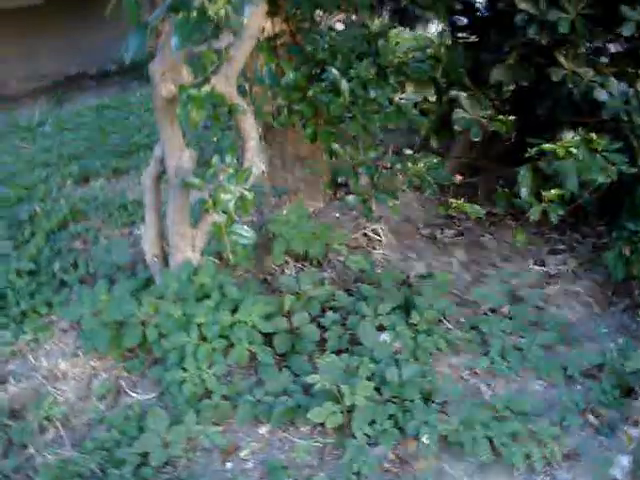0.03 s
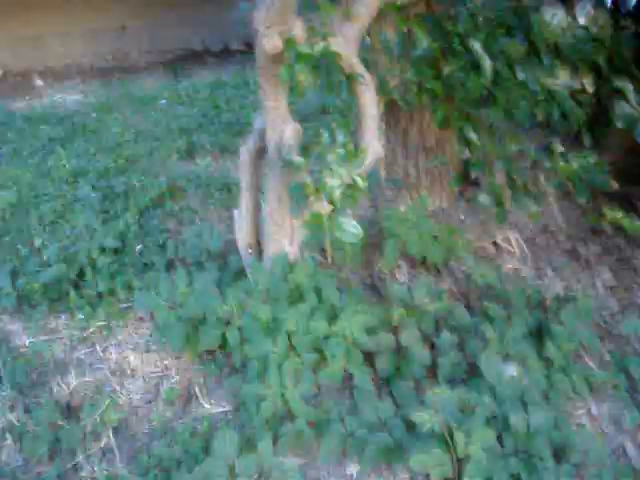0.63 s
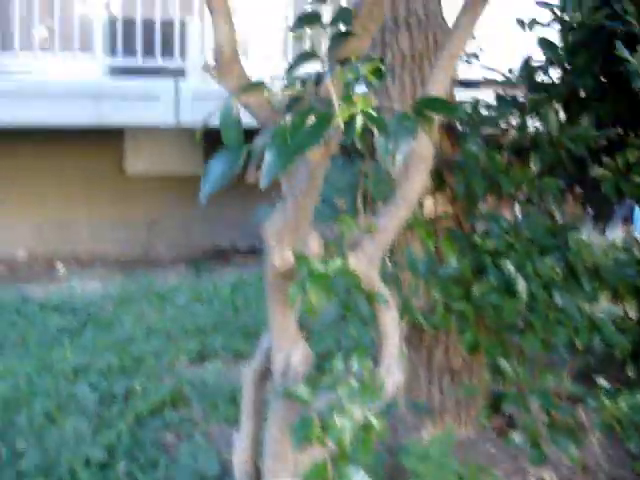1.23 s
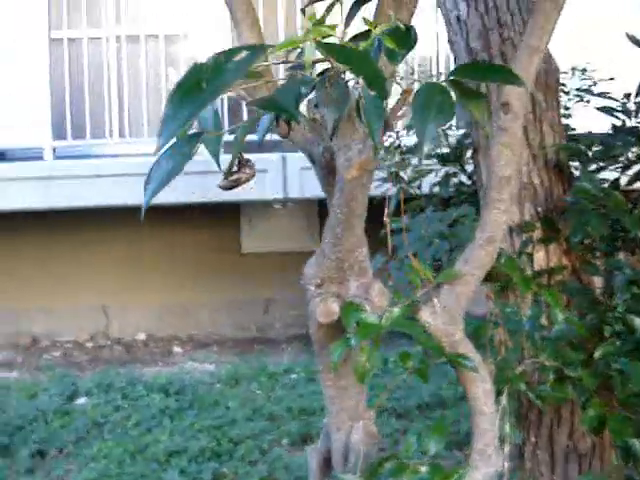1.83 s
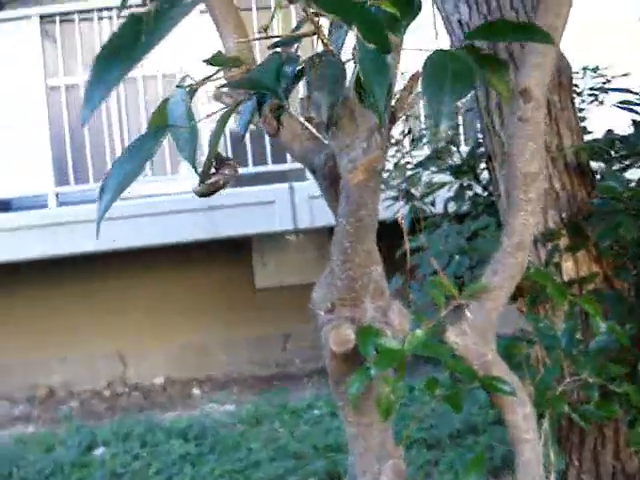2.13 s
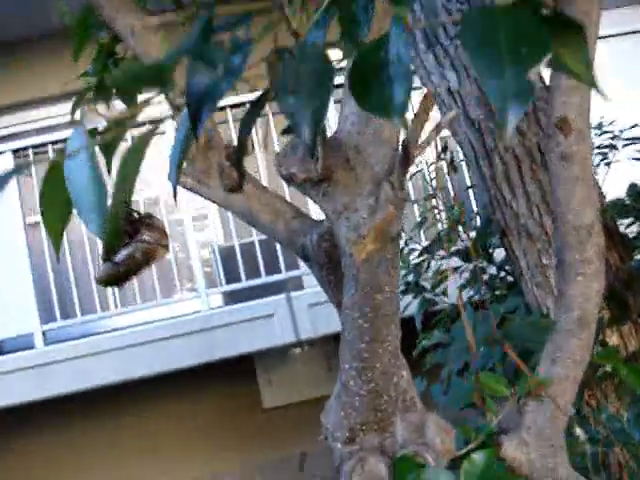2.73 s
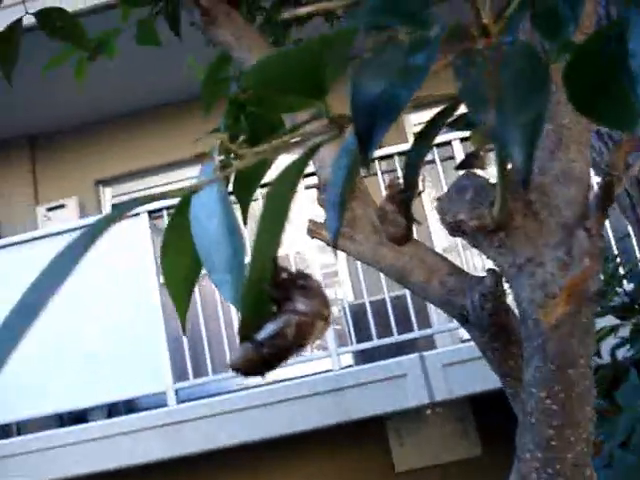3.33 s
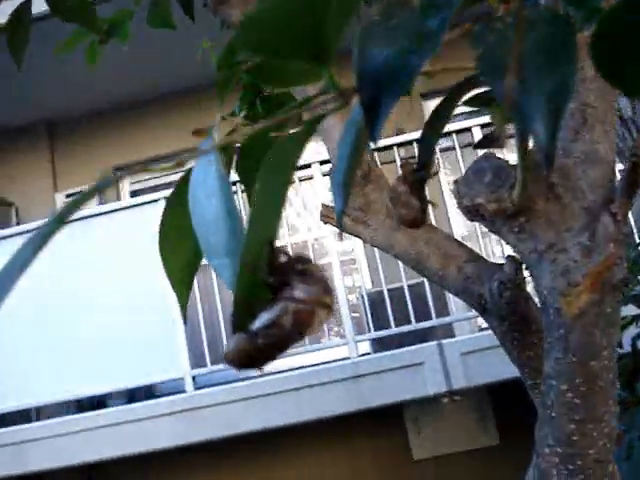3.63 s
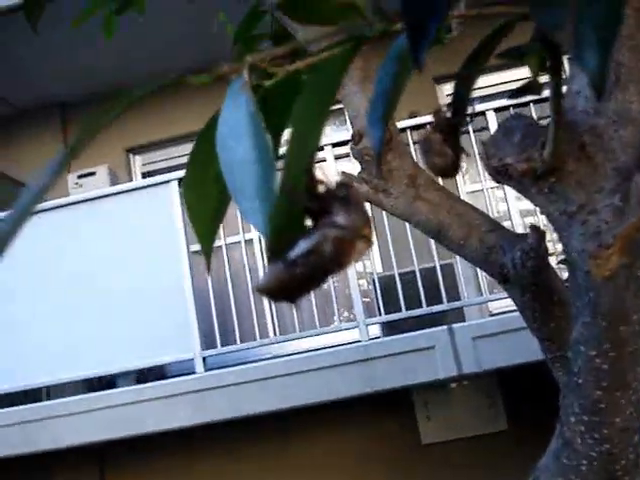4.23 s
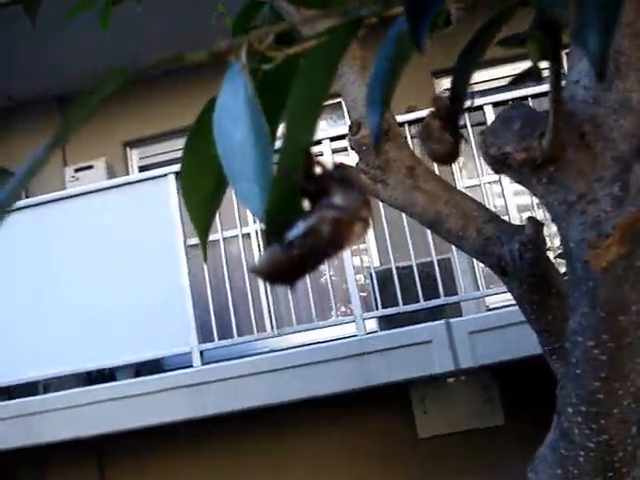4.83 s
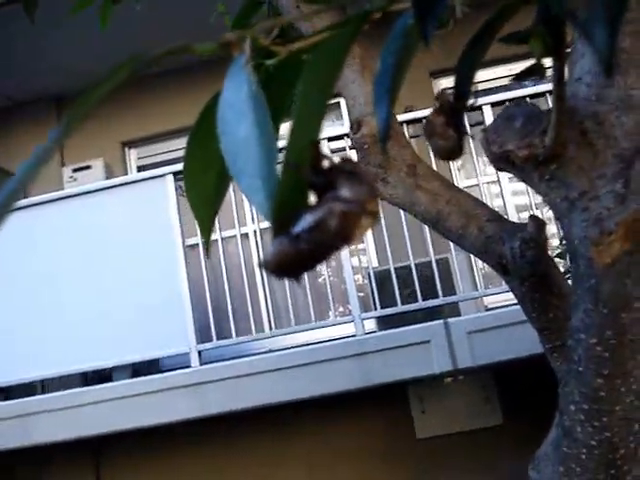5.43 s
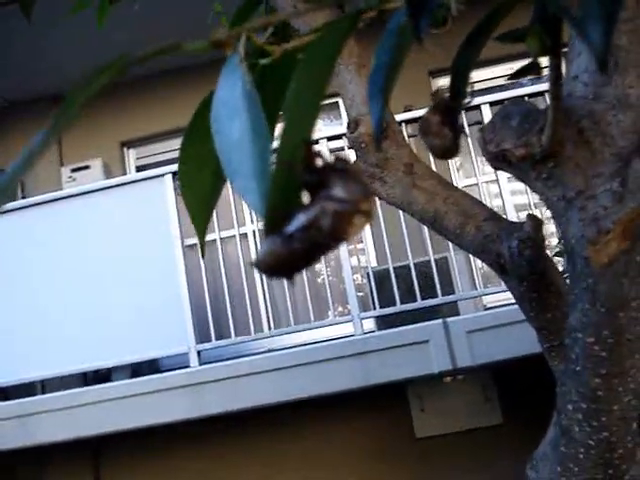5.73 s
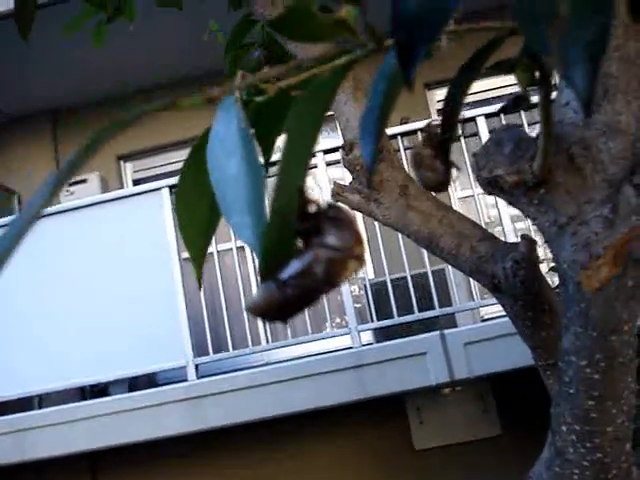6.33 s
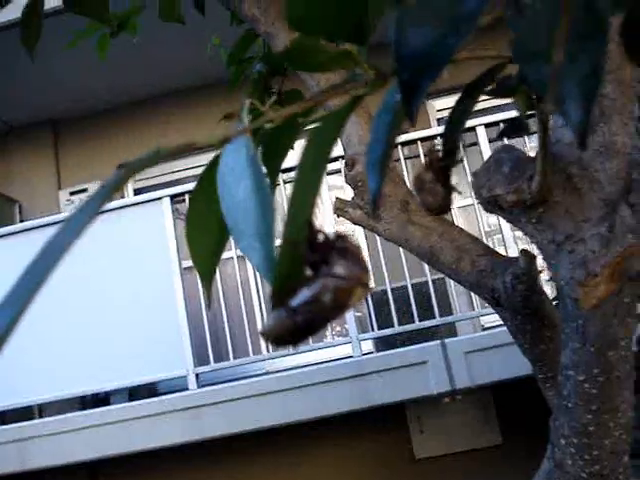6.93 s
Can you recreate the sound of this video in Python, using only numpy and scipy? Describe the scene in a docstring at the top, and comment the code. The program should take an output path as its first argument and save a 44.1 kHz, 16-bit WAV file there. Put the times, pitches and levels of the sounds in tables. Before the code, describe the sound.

A dense chorus of cicadas hisses in garden trees while one nearby cicada grows louder, pulsing in quick, buzzing, raspy syllables.

```python
"""Cicadas sing in garden trees beside an apartment block, heard through a small mono camera.
At first a crowd of buckling tymbals blends into a hiss, while a far caller throbs five times a second
and adds shrill surges. After a second a close caller enters faintly; it grows as the far one
dies away. Each syllable is a buzzing low note, then a bright rasp as its abdomen tightens.
From about five seconds on it quickens, while the crowd's hiss grows quieter."""
import sys
import numpy as np
from scipy import signal
from scipy.fft import rfft, irfft
from scipy.io import wavfile
from scipy.ndimage import map_coordinates

SR = 44100
rng = np.random.default_rng(int(sys.argv[2]) if len(sys.argv) > 2 else 0)


def inscribe(sig):
    """Save sig as 16-bit PCM at rate SR to the path in sys.argv[1].

    A 1-D sig is mono; a 2-D sig holds one channel per row.
    Samples are clipped to [-1, 1] before scaling.
    """
    pcm = np.round(np.clip(np.atleast_2d(sig).T, -1, 1) * 32767)
    wavfile.write(sys.argv[1], SR, pcm.astype(np.int16))


N = 308259
TIME = np.arange(N) / SR
TYMBAL_HZ = 366.8  # buckling rate under a slack abdomen
RASP_ENVELOPE_S = (0.032, 0.05, 0.033)  # attack, hold, release


def undb(db):
    """Decibels to amplitude ratio."""
    return 10 ** (np.asarray(db) / 20)


def unit(x):
    """Normalisation to rms 1."""
    return x / np.sqrt(np.mean(x ** 2))


def walk(rate_hz):
    """Spline interpolation of random values: a smooth drift with a spread near 1."""
    knots = rng.standard_normal(2048)
    return map_coordinates(knots, [TIME * rate_hz], order=3, mode="wrap")


def follow(curve):
    """Linear interpolation of each level column over time."""
    time_s, *columns = np.transpose(curve)
    return [np.interp(TIME, time_s, column) for column in columns]


def ring(x, outline, stretch=1, size=2048):
    """Minimum-phase filtering by a spectral outline; stretch multiplies all its frequencies."""
    hz, db = np.transpose(outline)
    grid_hz = np.maximum(np.fft.rfftfreq(size, 1 / SR), 1)
    gain_db = np.interp(np.log(grid_hz), np.log(np.sort(hz) * stretch), db)
    cepstrum = irfft(np.log(undb(gain_db)))
    cepstrum[1:size // 2] *= 2  # folding the cepstrum makes the response causal
    cepstrum[size // 2 + 1:] = 0
    impulse_response = irfft(np.exp(rfft(cepstrum)))
    return signal.oaconvolve(x, impulse_response)[:N]


def beats(first_s, period_s, hurry_from_s=0, hurry_s_per_s=0):
    """Periodic syllable times; once the caller hurries, the period shrinks linearly."""
    times = [first_s]
    while times[-1] < TIME[-1]:
        times.append(times[-1] + period_s - hurry_s_per_s * max(times[-1] - hurry_from_s, 0))
    return np.array(times)


def phrase(times, attack_s, hold_s, release_s):
    """Amplitude envelope of a row of calls: each swells to its time, holds and dies away."""
    rise = lambda since: np.clip(1 + since / attack_s, 0, 1)
    fall = lambda since: np.clip(1 - (since - hold_s) / release_s, 0, 1) ** 2
    return sum(rise(TIME - s) * fall(TIME - s) for s in times)


def tymbal(hz, jitter, scatter_db, rustle, decay_cycles):
    """Impulse excitation: the tymbal clicks as it buckles, and its ribs follow with a decaying rustle."""
    turns = np.cumsum(hz * (1 + jitter * walk(200))) / SR
    cycle = turns.astype(int)
    force = undb(scatter_db * rng.standard_normal(8192))[cycle % 8192]
    clicks = np.diff(cycle, prepend=0) * force
    ribs = np.exp(-(turns % 1) / decay_cycles) * force * rng.standard_normal(N)
    return unit(unit(clicks - clicks.mean()) + rustle * unit(ribs))


def foliage(x, wet_db, smear_s=0.013):
    """Scattering: leaves and trunks turn clicks into a diffuse hiss that follows their power."""
    decay = np.exp(-1 / (smear_s * SR))
    power = signal.lfilter([1 - decay], [1, -decay], x ** 2)
    diffuse = np.sqrt(power) * rng.standard_normal(N)
    return (x + undb(wet_db) * diffuse) / np.sqrt(1 + undb(wet_db) ** 2)


# spectrum of the neighbourhood's low wash: frequency_hz, gain_db
WASH_SPECTRUM = [(20, 8), (60, 4), (120, 3.5), (400, 3.5), (1000, 2), (1800, 2), (3000, -13.5)]


def neighbourhood(level_db):
    """Ambient noise: a low, broadband wash whose level wavers slightly."""
    return unit(ring(rng.standard_normal(N), WASH_SPECTRUM)) * undb(level_db + 0.55 * walk(21.07))


def chorus(resonances, waver_db, flutter_db, size_spread, wet_db, count=6):
    """Incoherent summation of cicadas, each with its own size, tymbal rate and wavering effort."""
    voices = 0
    for rank in np.linspace(-1, 1, count):
        hz = rng.uniform(150, 520) * (1 + .05 * walk(3))
        buzz = tymbal(hz, jitter=.15, scatter_db=1, rustle=3.2, decay_cycles=0.35)
        effort = undb(waver_db * walk(10) + flutter_db * walk(60))
        voices = voices + effort * ring(foliage(buzz, wet_db), resonances, 1 + size_spread * rank)
    return unit(voices)


# the crowd's hiss holds steady, then grows quieter: time_s, middle_db, treble_db
CROWD_LEVELS = [(0, -22.5, -22.0), (3.5, -23, -23), (5.3, -26.5, -25.5), (6.0, -29.5, -28), (7, -32.5, -29)]
# body resonances of the crowd, middle and treble bands: frequency_hz, gain_db
CROWD_MIDDLE = [(1500, -36), (1900, -18.5), (2300, -4), (2600, -4.5), (3100, -0.5), (3700, -3), (4500, 0),
                (5500, -2), (6300, -8), (7300, -25.5)]
CROWD_TREBLE = [(5400, -27.5), (6400, -4.5), (7300, 1), (8700, 1.5), (10000, -1), (12000, -2.5),
                (13900, -7.5), (15100, -1)]


def crowd():
    """Superposition: two distant choruses, one in each band, merge into a hiss."""
    middle_db, treble_db = follow(CROWD_LEVELS)
    middle = chorus(CROWD_MIDDLE, waver_db=0.5, flutter_db=0.4, size_spread=0.026, wet_db=-4.0)
    treble = chorus(CROWD_TREBLE, waver_db=0.63, flutter_db=2.0, size_spread=0.013, wet_db=-2.5)
    return middle * undb(middle_db) + treble * undb(treble_db)


def far_buzz(hz, wet_db):
    """Scattering by leaves blurs the pulse train of the far caller's tymbal."""
    buzz = tymbal(hz * (1 + .03 * walk(11)), jitter=.08, scatter_db=0.5, rustle=1.7, decay_cycles=0.25)
    return foliage(buzz, wet_db)


# resonances of a taut abdomen: frequency_hz, gain_db
TAUT_ABDOMEN = [(1700, -24), (3000, -17), (4500, -3), (5500, -2), (6450, -4.5), (7450, 4.5), (7900, -0.5),
                (8400, 2), (9100, 1), (10000, 0), (12500, -4.5), (13900, -10), (15300, -7.5)]


def rasp(wet_db):
    """Forced vibration: fast, ragged clicks ring the taut abdomen near 8 kHz."""
    buzz = tymbal(2 * TYMBAL_HZ, jitter=0.18, scatter_db=3.0, rustle=1.9, decay_cycles=0.8)
    return unit(ring(foliage(buzz, wet_db), TAUT_ABDOMEN))


# the far song holds, then dies away: time_s, level_db
FAR_LEVELS = [(0, -29), (.5, -28), (1.3, -27), (2.45, -27.5), (2.8, -31), (3.5, -50)]
# body resonances of its throb: frequency_hz, gain_db
THROB_RESONANCES = [(1600, -43.5), (2000, -14.5), (2280, 1), (2600, -4), (3080, 1), (3500, -2.5),
                    (4200, -16), (9000, -49)]


def far_caller():
    """Amplitude modulation at an even beat: low throbs alternate with faint rasps."""
    times = beats(first_s=.07, period_s=.2)
    rasp_lag_s, rasp_db = 0.12, -7.5  # relative to the throb
    level_db, = follow(FAR_LEVELS)
    throb_gain = phrase(times, attack_s=0.07, hold_s=0.014, release_s=0.15)
    throbs = unit(ring(far_buzz(hz=341.7, wet_db=4.0), THROB_RESONANCES)) * throb_gain
    rasps = rasp(wet_db=21) * phrase(times + rasp_lag_s, *RASP_ENVELOPE_S) * undb(rasp_db)
    return (throbs + rasps) * undb(level_db)


# the far caller's shrill surges, just after some of its throbs: peak_s, level_db, resonance_hz
SURGES = [(0.14, -26, 5000), (0.34, -24, 4620), (0.54, -27, 4650), (0.61, -27, 4750), (1.58, -27, 4650),
          (1.66, -32, 4700), (1.735, -24, 4650), (2.15, -27, 5230), (2.48, -24, 3570)]
# body resonances of a shrill call: frequency_hz, gain_db
SHRILL_RESONANCES = [(3000, -25.5), (4100, -10.5), (4650, -1), (4950, -1.5), (5400, -9), (6200, -17.5),
                     (9000, -20)]
SHRILL_CENTRE_HZ = 4780


def far_surges():
    """Resonance scaling: the far caller's buzz swells, ringing at each surge's own frequency."""
    buzz = far_buzz(hz=431, wet_db=2)
    surges = 0
    for peak_s, level_db, resonance_hz in SURGES:
        tone = unit(ring(buzz, SHRILL_RESONANCES, resonance_hz / SHRILL_CENTRE_HZ))
        surges += tone * phrase([peak_s], attack_s=0.03, hold_s=0.012, release_s=0.1) * undb(level_db)
    return surges


# the close caller emerges from the crowd: time_s, note_db, rasp_db, scattered_to_direct_db
CLOSE_LEVELS = [(1, -32, -43, 5), (2.8, -31, -29.5, 12), (3.6, -26, -25.5, 9), (5.4, -23.5, -23.1, 4.5),
                (6.2, -24, -22.5, 2), (7, -26, -22, -4)]
# resonances of its slack abdomen: frequency_hz, gain_db
SLACK_ABDOMEN = [(1600, -26), (2000, -14.5), (2280, -4), (2500, -5), (2780, -2.5), (2950, 3), (3120, -1.5),
                 (3800, -2.5), (4600, -6), (6200, -8.5), (8500, -21), (11000, -14), (13800, -19),
                 (15200, -13.5)]
# spectrum of the dull flutter under its loudest rasps: frequency_hz, gain_db
FLUTTER_SPECTRUM = [(20, 15.5), (60, 3), (150, 2), (400, 0), (1000, -3), (1800, -2.5), (3500, -15.5)]


def close_caller():
    """Tension raises resonance: the abdomen rings near 3 kHz, passes a shrill accent, then rasps."""
    times = beats(first_s=.992, period_s=.248, hurry_from_s=5.02, hurry_s_per_s=.021)
    note_lead_s, accent_lead_s, rasp_lead_s = 0.097, 0.03, 0.021  # each part peaks ahead of the beat
    accent_db, leak_db = -7.5, -9.5  # accent and faint rasp within the note, relative to the note
    note_db, rasp_db, wet_db = follow(CLOSE_LEVELS)
    note_gain = phrase(times - note_lead_s, attack_s=0.13, hold_s=.048, release_s=0.079) * undb(note_db)
    accent_shape = phrase(times - accent_lead_s, attack_s=0.023, hold_s=0.016, release_s=0.06)
    rasp_shape = phrase(times - rasp_lead_s, *RASP_ENVELOPE_S)
    rasp_gain = np.hypot(rasp_shape * undb(rasp_db), note_gain * undb(leak_db))

    hz = TYMBAL_HZ * (1 + .015 * walk(14))
    buzz = foliage(tymbal(hz, jitter=.03, scatter_db=0.5, rustle=0.82, decay_cycles=0.44), wet_db)
    notes = unit(ring(buzz, SLACK_ABDOMEN)) * note_gain
    shrill = ring(ring(buzz, SHRILL_RESONANCES, stretch=0.88), SHRILL_RESONANCES, stretch=0.94)
    accents = unit(shrill) * accent_shape * undb(note_db + accent_db)
    # the flutter grows with the square of the rasp, so only the loudest carry it
    flutter = unit(ring(rng.standard_normal(N), FLUTTER_SPECTRUM)) * rasp_gain ** 2 * undb(5.0)
    return notes + accents + rasp(wet_db) * rasp_gain + flutter


def scene():
    """Superposition of crowd, callers and a faint wash, the same in both channels."""
    _, treble_db = follow(CROWD_LEVELS)
    cicadas = crowd() + close_caller() + far_caller() + far_surges()
    mono = cicadas + neighbourhood(level_db=treble_db - 20.5)
    return np.array([mono, mono])


# overall tone colour: frequency_hz, gain_db
TONE_COLOUR = [(20, -1.5), (9000, 0.5), (9900, -3), (10150, -13.5), (11200, -10.5), (15300, -7.5),
               (16000, -14)]


def record(dry):
    """Band limiting: the treble drops sharply above 10 kHz, and the camera cuts off the very top."""
    cutoff_hz = 15750
    coloured = np.array([ring(channel, TONE_COLOUR) for channel in dry])
    return signal.sosfilt(signal.ellip(12, .2, 75, cutoff_hz, fs=SR, output="sos"), coloured)


dry = scene()
out = record(dry)
inscribe(out)
```